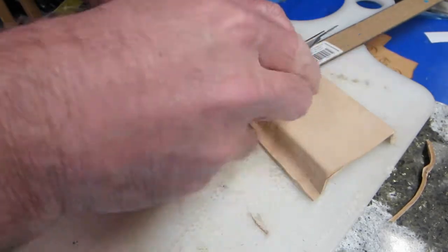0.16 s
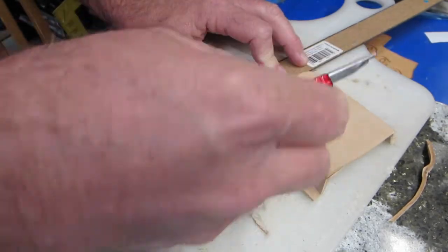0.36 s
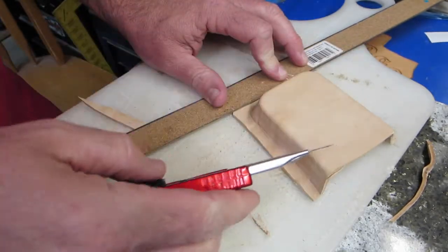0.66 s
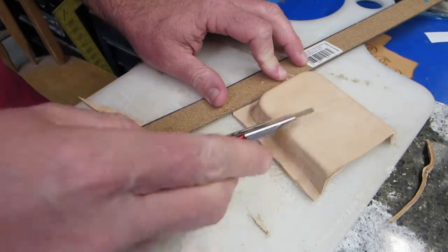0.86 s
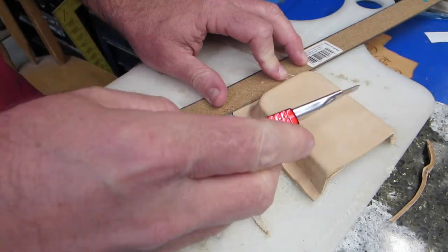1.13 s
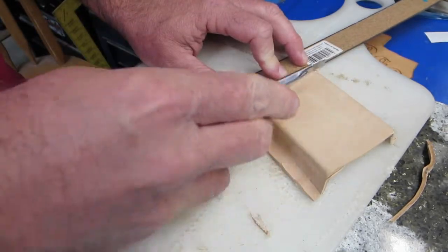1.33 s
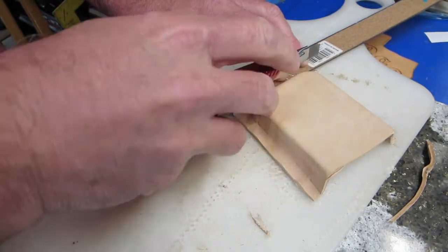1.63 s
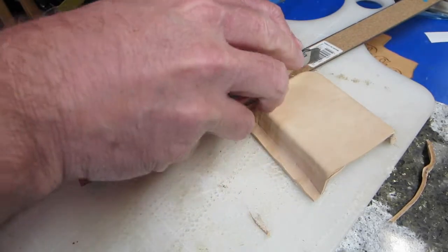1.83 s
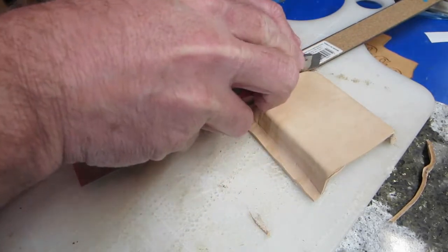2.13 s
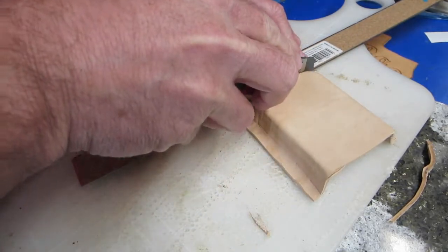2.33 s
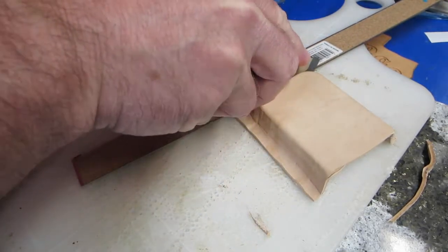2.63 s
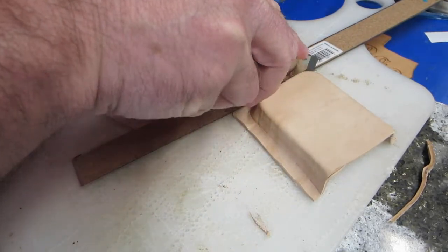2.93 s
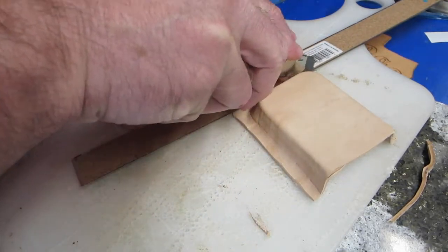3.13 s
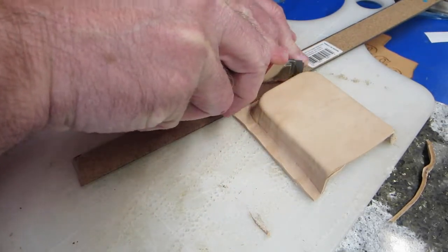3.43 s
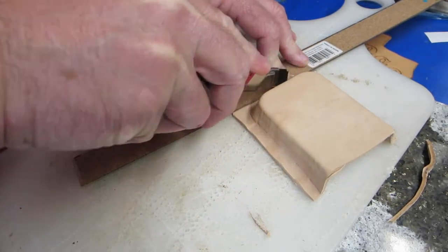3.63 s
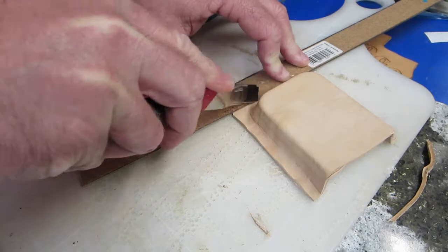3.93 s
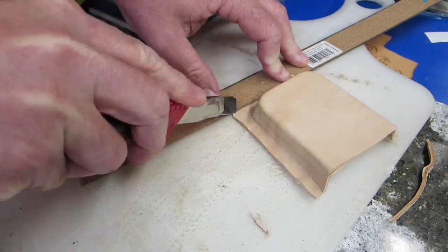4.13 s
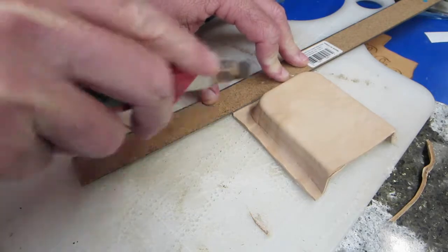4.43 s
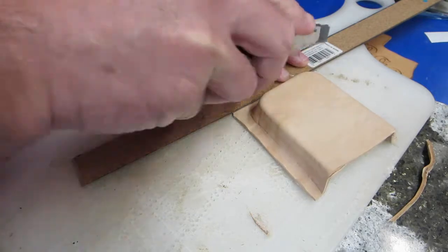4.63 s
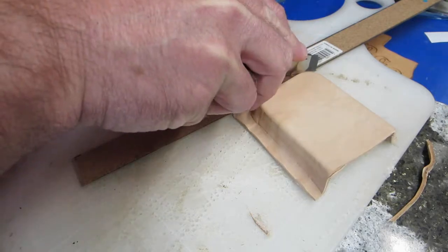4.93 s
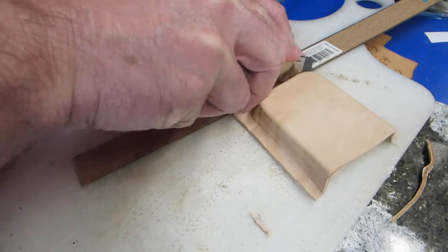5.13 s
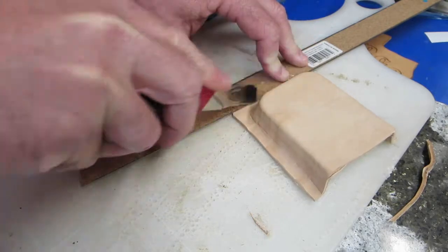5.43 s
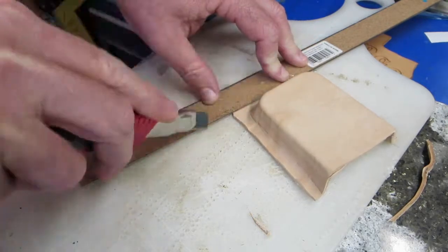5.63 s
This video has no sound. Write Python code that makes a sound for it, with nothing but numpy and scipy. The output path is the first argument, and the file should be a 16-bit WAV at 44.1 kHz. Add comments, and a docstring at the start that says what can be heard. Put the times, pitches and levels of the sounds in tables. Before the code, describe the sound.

Motors hum throughout in a small workshop, throbbing about twice a second over soft ventilation noise; a very faint whine sinks in pitch early on. Close by, hands brush wet leather near 0.1 and 0.9 seconds, and a utility knife blade clicks at 0.6. From 1.9 to 2.6 come more soft rubbing, dull bumps and a cluster of sharp clicks, then tiny creaks until 3. From 3.3 to 4.2 the knife cuts through the leather with an uneven, dry rasp. At 4.3 the blade hits the plastic cutting board with the loudest knock and a low thud. The knife's slider ratchets in quick double clicks from about 4.4 to 4.8, ending in a strong snap. A second, louder rasp swells from 5.1, ends in a knock at about 5.55 and is followed by a bright click at 5.7. The room adds only a short reverberation.

```python
"""Two motors hum and beat slowly in a small workshop, with a faint whine, while hands rub over wet leather.
Close by, a utility knife clicks, creaks and is drawn twice along a ruler through the hide. Stick-slip
friction and snapping fibres drive the resonances of knife and plastic cutting board in a dense rasp.
The blade knocks on the board as it runs off the edge; between the cuts its slider clicks notch by notch."""
import sys
import numpy as np
from scipy import signal
from scipy.io import wavfile
from scipy.ndimage import uniform_filter1d

SR = 44100
rng = np.random.default_rng(int(sys.argv[2]) if len(sys.argv) > 2 else 0)


def output_pcm(signal):
    """Save a mono or channel-first signal as 16-bit PCM at the path in sys.argv[1].

    Samples are clipped to [-1, 1] before scaling.
    """
    pcm = np.clip(np.atleast_2d(signal).T, -1, 1) * 32767
    wavfile.write(sys.argv[1], SR, np.round(pcm).astype(np.int16))


N = 254016
TIME = np.arange(N) / SR


def from_db(db):
    """Decibels to amplitude ratio."""
    return 10 ** (np.asarray(db) / 20)


def rms_one(x):
    """Normalisation to unit power."""
    return x / np.sqrt(np.mean(x ** 2) + 1e-20)


def band(x, low_hz, high_hz, order=2):
    """Butterworth band-pass."""
    sos = signal.butter(order, [low_hz, min(high_hz, SR * .45)], "band", fs=SR, output="sos")
    return signal.sosfilt(sos, x)


def at_hz(points, hz):
    """Interpolation on a log-frequency axis."""
    frequencies, values = np.transpose(points)
    return np.interp(np.log(hz), np.log(frequencies), values)


def drift(rate):
    """Random modulation: a line through rate unit Gaussian values a second."""
    return np.interp(TIME * rate, np.arange(8192), rng.standard_normal(8192))


def add(track, s, sound):
    """Superposition: a sound joins the track at s seconds."""
    start = round(s * SR)
    track[..., start:start + sound.shape[-1]] += sound[..., :N - start]


def resonate(x, peaks):
    """Forced vibration of parallel damped resonators with alternating signs."""
    out = 0
    for k, (hz, width, db) in enumerate(peaks):
        r = np.exp(-np.pi * width / SR)
        zeros = [(1 - r * r) / 2, 0, (r * r - 1) / 2]
        poles = [1, -2 * r * np.cos(2 * np.pi * hz / SR), r * r]
        out = out + (-1) ** k * from_db(db) * signal.lfilter(zeros, poles, x + 1e-18)
    return out


def two_sides(mid, side, apart_hz=3800, side_db=-1):
    """Coherence falls with wavelength: left and right share the lows and differ in the treble."""
    return mid + from_db(side_db) * band(side, apart_hz, 14000, order=1) * np.array([[1], [-1]])


def air(level_db=-49, flicker_db=1.83):
    """Diffuse ventilation noise in flickering half-octave bands, coherent in the bass."""
    # noise spectrum: (frequency [Hz], relative density [dB])
    spectrum = [(25, -25), (45, -5), (80, 0), (125, 0), (180, -13), (250, -5), (350, -14), (520, -16),
                (760, -15), (1200, -23), (2500, -30), (5000, -37), (10000, -41), (16000, -42)]
    # likeness of left and right: (frequency [Hz], coherence [0-1])
    coherence = [(60, 1.0), (180, 0.99), (550, 0.27), (1650, 0.31), (4970, 0.04), (15000, 0.017)]
    out, white = 0, rng.standard_normal((2, 2, N))
    edges = 22 * 2 ** (np.arange(20) / 2)
    for k, (low, high) in enumerate(zip(edges, edges[1:])):
        mid, side = band(white[k % 2], low, high)
        hz = np.sqrt(low * high)
        alike = at_hz(coherence, hz)
        stereo = np.sqrt(1 + alike) * mid + np.sqrt(1 - alike) * side * [[1], [-1]]
        out = out + from_db(at_hz(spectrum, hz) + flicker_db * drift(9.3)) * stereo
    return from_db(level_db) * rms_one(out)


def motors(in_phase_s=0.48, fan_hz=236.2, fan_db=-59):
    """Beating: two motors of nearly equal speed throb about twice a second; a fan adds a wavering tone."""
    # hum of motors and mains: (frequency [Hz], rms level [dB])
    tones = [(57.35, -46), (59.235, -46), (118.47, -57), (119.99, -57)]
    hum = sum(from_db(db) * np.sqrt(2) * np.cos(2 * np.pi * hz * (TIME - in_phase_s)) for hz, db in tones)
    fan = rms_one(resonate(rng.standard_normal(N), [(fan_hz, 5, 0)]))
    return hum + from_db(fan_db) * fan


def whine(start_hz=1115, end_hz=765, settle_s=0.85, waver_hz=18, base_db=-71.5, swell_db=8):
    """Frequency modulation: a thin, unsteady tone sinks towards a final pitch and swells once."""
    hz = end_hz + (start_hz - end_hz) * np.exp(-TIME / settle_s) + waver_hz * drift(70)
    db = base_db + swell_db * np.exp(-((TIME - 0.97) / 0.42) ** 2)
    return from_db(db) * np.sqrt(2) * np.sin(2 * np.pi * np.cumsum(hz) / SR)


def fibres(per_s, size_db, friction):
    """Shot noise: fibres snap at random with uneven sizes, over smooth sliding friction."""
    sizes = from_db(size_db * np.minimum(rng.exponential(1, (2, N)), 4))
    signs = rng.choice([-1, 1], (2, N))
    snaps = rms_one(sizes * signs * (rng.random(N) < per_s / SR))
    sliding = friction * rng.standard_normal((2, N))
    return rms_one(two_sides(*(snaps + sliding)))


def travelling(force, peaks, wander_db=2.5, rate=11):
    """Modal coupling varies with position: a moving contact feeds each resonance now more, now less."""
    return sum((-1) ** k * resonate(force, [peak]) * from_db(wander_db * drift(rate))
               for k, peak in enumerate(peaks))


def hand_reflection(x, echo=0.16, lag_s=0.00025, swing_s=0.00004):
    """Comb filtering: a reflection off the moving hand sweeps shallow notches through the hiss."""
    delay_s = lag_s + swing_s * drift(6)
    return x + echo * np.array([np.interp(TIME - delay_s, TIME, side) for side in x])


def scrape(gains, force, board_db, knife_db, hiss_db):
    """Source and filter: one rough force shakes the board and the knife and hisses at the edge."""
    # resonances under a sliding contact: (frequency [Hz], bandwidth [Hz], relative level [dB])
    board_modes = [(441, 30, -5), (522, 9.3, -2.5), (674, 32, -5), (832, 54, -1), (1056, 127, 2),
                   (1417, 390, -6.5)]
    knife_modes = [(1705, 95, -2.5), (1849, 57, 7), (2184, 214, 4), (2415, 177, 3.5), (2700, 200, 1.5),
                   (3310, 420, -3), (3860, 250, -1.5), (4383, 57, -4.5)]
    hiss_modes = [(4790, 1100, 0), (6264, 170, 5.5), (6950, 1130, -2), (8880, 290, 1), (9450, 230, 1),
                  (11940, 2100, -2), (14000, 1300, -6.5), (14900, 540, -6)]
    board = band(travelling(force, board_modes, wander_db=3), 270, 2620)
    knife = band(travelling(force, knife_modes), 1680, 10000)
    hiss = hand_reflection(band(travelling(force, hiss_modes), 4200, 14000))
    parts = zip((board_db, knife_db, hiss_db), gains, (board, knife, hiss))
    return sum(from_db(db) * gain * rms_one(part) for db, gain, part in parts)


def rubbing(fade_db=16):
    """Sliding friction: skin and ruler brush the damp hide, fade_db down at one rise or fall time."""
    # rubs: (peak time [s], level [dB], rise [s], fall [s], board's share [dB])
    rubs = [(0.14, -56.5, 0.072, 0.062, 1), (0.845, -60.5, 0.089, 0.072, -10),
            (0.995, -68, 0.054, 0.046, -19), (1.92, -60.5, 0.24, 0.15, 7.5), (2.561, -55, 0.26, 0.1, 3.5)]
    gains = np.zeros((3, N))
    for s, db, rise_s, fall_s, share_db in rubs:
        away = np.maximum((s - TIME) / rise_s, (TIME - s) / fall_s)
        gains += from_db(db - fade_db * away) * from_db([[share_db], [0], [-2.5]])   # board, knife, hiss
    force = fibres(per_s=3400, size_db=8, friction=1.6)
    return scrape(gains, force, board_db=-2, knife_db=0.4, hiss_db=-0.9)


def creaks(unevenness=0.43):
    """Stick-slip motion: the tip presses into the leather, and each slip ticks in the knife."""
    # runs of slips: (start [s], end [s], slip rate [1/s], typical peak [dB])
    runs = [(2.657, 2.768, 60, -46.5), (2.869, 2.9, 91, -51), (2.954, 2.982, 104, -43.5),
            (3.02, 3.046, 90, -48), (4.242, 4.272, 320, -32.5)]
    slips = np.zeros(N)
    for start, end, per_s, peak_db in runs:
        gaps = np.exp(unevenness * rng.standard_normal(64)) / per_s
        times = start + np.cumsum(gaps) - gaps[0]
        for s, chance in zip(times[times < end], rng.standard_normal(len(gaps))):
            add(slips, s, from_db([peak_db + 2 * chance]))
    impulse = np.r_[1., np.zeros(SR // 50)]
    tick = resonate(impulse, [(2570, 650, -5.5), (4190, 180, -1.5), (5300, 1000, -15)])
    return signal.fftconvolve(slips, tick / np.abs(tick).max())[:N]


def click(peak_db, ping_hz, parts_db, chatter_s=0.0041, rattle_s=0.035, rattle_db=-25, snap_s=0.0007,
          ping_db=-9, ping_width_hz=45, steel_hz=4150, steel_db=-6):
    """Impact excitation: a snap and brief chatter ring shell, blade and edge, weighted by parts_db."""
    # modes of handle shell, blade and edge: (frequency [Hz], bandwidth [Hz], relative level [dB])
    shell_modes = [(1985, 405, -1), (2375, 124, 4), (2660, 155, 1)]
    blade_modes = [(3065, 520, -2.5), (3620, 540, 0.5), (4094, 230, 2.5)]
    edge_modes = [(4850, 1300, -3.5), (6230, 270, 1.5), (6640, 290, 1), (7460, 670, 1), (8630, 1570, -1.5),
                  (11220, 180, 0.5), (11340, 1440, -6), (15100, 2100, -12)]
    t = TIME[:SR // 8]
    decay = np.exp(-t / chatter_s) + from_db(rattle_db) * np.exp(-t / rattle_s)
    chatter = rng.standard_normal((2, len(t))) * decay
    chatter[:, round(snap_s * SR)] += 2.95   # the snap
    force = two_sides(*chatter * np.minimum(t / snap_s, 1))
    shell, blade, edge = [from_db(db) * rms_one(resonate(force, modes))
                          for db, modes in zip(parts_db, (shell_modes, blade_modes, edge_modes))]
    notes = np.sin(2 * np.pi * ping_hz * t) + from_db(steel_db) * np.sin(2 * np.pi * steel_hz * t)
    ping = rms_one(notes * np.exp(-np.pi * ping_width_hz * t))
    # the ping takes its strength from shell and blade, so bright snaps stay dry
    sound = shell + blade + edge + from_db(ping_db) * np.std(shell + blade) * ping
    return from_db(peak_db) * sound / np.abs(sound.mean(axis=0)).max()


def loose_blade():
    """Backlash: the blade clicks in its handle; a sharper contact rings the edge more, the shell less."""
    # contacts: (time [s], peak [dB], ping frequency [Hz], brightness [dB])
    contacts = [(0.3803, -46, 2360, -3), (0.5559, -25, 3460, 7), (1.153, -52.5, 2370, -7),
                (2.0255, -25.5, 2040, 3.5), (2.0834, -37.5, 4200, -3), (2.142, -39, 4200, -5),
                (2.164, -31, 2670, -1.5), (2.2481, -17.5, 2366, 0.5), (2.3201, -23.5, 2130, -5),
                (2.5658, -36.5, 2110, -3), (2.9304, -45.5, 3940, -1), (3.0106, -47, 2000, -1),
                (4.2584, -10.5, 2190, -2), (4.2738, -22.5, 2070, -2), (4.284, -17.5, 3900, -1.5),
                (4.3919, -13.5, 3000, 5.5), (4.8427, -7.5, 2000, -2.5), (4.886, -25, 2530, -5),
                (5.6881, -16, 3130, 5)]
    out = np.zeros((2, N))
    for s, peak_db, ping_hz, bright_db in contacts:
        add(out, s, click(peak_db, ping_hz, parts_db=(-12 - bright_db, -11.5, -12.5 + bright_db)))
    return out


def slider():
    """A detent clicks twice: the spring rides up a tooth, ringing the blade, then drops in brightly."""
    # notches: (time [s], peak of the ride [dB], delay of the drop [s], peak of the drop [dB])
    notches = [(4.4662, -22.5, 0.0388, -23.5), (4.5892, -33, 0.0197, -27.5), (4.6688, -24.5, 0.047, -27),
               (4.7574, -23.5, 0.0286, -27.5)]
    out = np.zeros((2, N))
    for s, ride_db, drop_s, drop_db in notches:
        add(out, s, click(ride_db, ping_hz=2335, parts_db=(-22, -6, -17), chatter_s=0.003,
                          rattle_db=-29, ping_width_hz=26, steel_db=-12))
        add(out, s + drop_s, click(drop_db, ping_hz=2750, parts_db=(-16, -12, -11), chatter_s=0.004,
                                   rattle_db=-30, ping_db=-13, steel_db=-16))
    return out


def struck(modes, contact_s):
    """Free vibration: damped sines swell over the contact time; peak 1."""
    t = TIME[:SR // 2]
    ring = sum(from_db(db - 60 * t / t60) * np.sin(2 * np.pi * hz * t) for hz, db, t60 in modes)
    ring *= 1 - np.exp(-t / contact_s)
    return ring / np.abs(ring).max()


def softened(knock, cutoff_hz):
    """A compliant contact acts as a low-pass filter; peak 1."""
    dull = signal.sosfilt(signal.butter(2, cutoff_hz, fs=SR, output="sos"), knock)
    return dull / np.abs(dull).max()


def knocks(blade_thud_db=-20.5):
    """Damped modes: the blade knocks on the board, then the weight of the hand thuds in the bench."""
    # blows: (time [s], knock level [dB], contact cutoff [Hz], hand's lag [s], hand's thud [dB])
    blows = [(1.955, -26.5, 1000, 0.008, -42), (2.159, -33.5, 574, 0.0071, -34),
             (2.240, -28.5, 1170, 0.0082, -32.5), (4.26, 0, 5030, 0.0068, -21.5),
             (4.845, -37, 1500, 0.00402, -29.5), (5.553, -13.5, 2120, 0.024, -24)]
    # modes of the board and the bench under it: (frequency [Hz], relative level [dB], T60 [s])
    board_modes = [(406, -25.5, 0.074), (575, -30.5, 0.084), (702, -18, 0.033), (897, -3, 0.0095),
                   (1114, 7.5, 0.009), (1330, -3.5, 0.011), (2100, -22.5, 0.075), (3630, -22.5, 0.055)]
    bench_modes = [(137.5, 2.5, 0.11), (267, -10, 0.2), (299, 1, 0.07)]
    knock = struck(board_modes, contact_s=0.0017)
    thud = struck(bench_modes, contact_s=0.0022)
    hand = thud + softened(knock, cutoff_hz=650)
    out = np.zeros(N)
    for s, knock_db, cutoff_hz, lag_s, thud_db in blows:
        add(out, s, from_db(knock_db) * (softened(knock, cutoff_hz) + from_db(blade_thud_db) * thud))
        add(out, s + lag_s, from_db(thud_db) * hand)
    return out


def stroke_gains(hiss_start_db=-7, hiss_growth_db=3):
    """Amplitude envelopes of board, knife and hiss follow the effort; the hiss grows along each stroke."""
    # one list for each stroke: (time [s], effort [dB], share of the board under the tip [dB])
    strokes = [
        [(3.22, -72, 10), (3.274, -53, -9), (3.294, -67, 5), (3.406, -40.5, -8.5), (3.438, -48, 0),
         (3.65, -40, 4.5), (3.804, -44, -0.5), (3.842, -40, 1.5), (3.912, -44, -4), (3.938, -36, -0.5),
         (4.136, -38.5, -6), (4.168, -44.5, 5), (4.178, -39.5, -3), (4.225, -71, 4)],
        [(5.115, -86, 3), (5.137, -52.5, -11), (5.387, -26, 1.5), (5.395, -30, 0.5), (5.495, -22.5, -3),
         (5.551, -24, -2.5), (5.575, -40.5, -1), (5.609, -40, -0.5), (5.67, -62, 2)],
    ]
    gains = np.zeros((3, N))
    for rows in strokes:
        s, effort_db, board_db = np.transpose(rows)
        effort = from_db(np.interp(TIME, s, effort_db, left=-np.inf, right=-np.inf))
        hiss_db = hiss_start_db + hiss_growth_db * np.interp(TIME, [s[0], s[-1]], [0, 1])
        gains += effort * from_db([np.interp(TIME, s, board_db), np.zeros(N), hiss_db])
    return gains


def cutting(judder_db=1.3, catch_s=0.0026, thrum_db=-43.5, sing_db=-46, grip_db=-49, hard_pull_db=-18.5):
    """Stick-slip friction: the blade rasps through the leather, the bench thrums and the knife sings."""
    # tough fibres that catch and give way: (time [s], extra force [dB])
    catches = [(3.322, 10), (3.392, 6.5), (3.628, 6), (4.117, 10), (5.141, 8), (5.191, 12), (5.221, 13.5),
               (5.488, 2), (5.521, 10), (5.553, 5)]
    # the knife's modes under a light touch: (frequency [Hz], bandwidth [Hz], relative level [dB])
    singing_modes = [(2320, 120, 8), (2606, 120, 7), (4000, 100, -5.5), (4520, 46, -2), (6260, 80, -7),
                     (8260, 410, -28), (11800, 760, -7.5)]
    catch_db = sum(db * np.exp(-((TIME - s) / catch_s) ** 2) for s, db in catches)
    force = fibres(per_s=4000, size_db=3.5, friction=0.41) * from_db(judder_db * drift(220) + catch_db)
    board, effort, hiss = stroke_gains()
    grip = effort / (effort + from_db(grip_db))   # thrum and singing level off once the blade grips
    bench = resonate(rng.standard_normal(N), [(135.8, 9.3, 4.5), (312, 330, -14)])
    thrum = from_db(thrum_db) * rms_one(bench)
    singing = from_db(sing_db) * rms_one(resonate(force, singing_modes))
    opening = (effort / from_db(hard_pull_db)) ** 0.54   # a hard pull opens the top of the hiss
    tearing = from_db(-4) * hiss * opening * rms_one(band(force, 13600, 15000))
    rasp = scrape((board, effort, hiss), force, board_db=-1.12, knife_db=-0.95, hiss_db=1.5)
    return rasp + grip * (thrum + singing) + tearing


def near_field(x, lag_s=0.000012, left_db=0.03):
    """Interaural cues: the work lies a little to the left, so the right side is later and softer."""
    right = np.interp(TIME - lag_s, TIME, x[1])
    return np.array([x[0] * from_db(left_db), right * from_db(-left_db)])


def workshop(x, wet_db=-14, low_t60=0.31, high_t60=0.3, high_db=-5, first_wall_s=0.0098):
    """Diffuse reverberation: a cluttered room gives a short exponential tail with weaker treble."""
    t = TIME[:SR // 2]
    reflections = rng.standard_normal((2, len(t))) * (1 - np.exp(-(t / first_wall_s) ** 2))
    low = reflections * from_db(-60 * t / low_t60)
    high = reflections * from_db(high_db - 60 * t / high_t60)
    tail = (band(low, 140, 4400) + band(high, 4500, 15000)) / np.sqrt(np.sum(low[0] ** 2))
    return from_db(wet_db) * signal.fftconvolve(x[None], tail, axes=1)[:, :N]


def gain_control(x, threshold_db=-13, release_db_per_s=7, attack_s=0.0077):
    """Compression: a loud blow turns the gain down, and it creeps back."""
    power = uniform_filter1d(np.mean(x ** 2, axis=0), size=132)
    excess_db = np.maximum(10 * np.log10(np.maximum(power, 1e-12)) - threshold_db, 0)
    recovery = release_db_per_s * TIME
    cut_db = np.maximum.accumulate(excess_db + recovery) - recovery
    r = np.exp(-1 / (attack_s * SR))
    return x * from_db(-signal.lfilter([1 - r], [1, -r], cut_db))


def scene():
    """Superposition of the direct sound of the work, its reverberation and the background."""
    work = cutting() + rubbing() + creaks() + loose_blade() + slider() + knocks()
    return near_field(work) + workshop(work.mean(axis=0)) + air() + motors() + whine()


def record(dry, cutoff_hz=16000):
    """Compression, clipping at full scale and a steep low-pass filter."""
    low_pass = signal.ellip(10, .1, 80, cutoff_hz, fs=SR, output="sos")
    return signal.sosfilt(low_pass, np.clip(gain_control(dry), -1, 1))


dry = scene()
out = record(dry)
output_pcm(out)
```